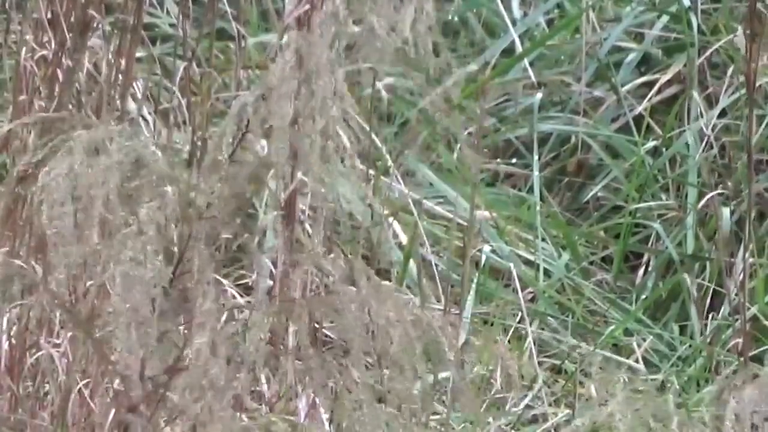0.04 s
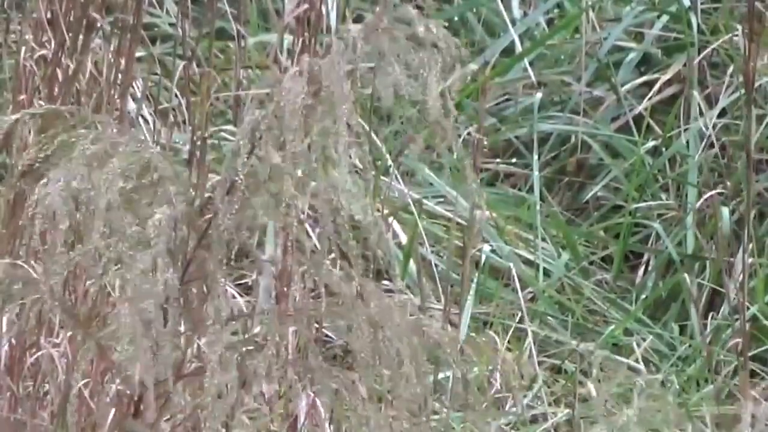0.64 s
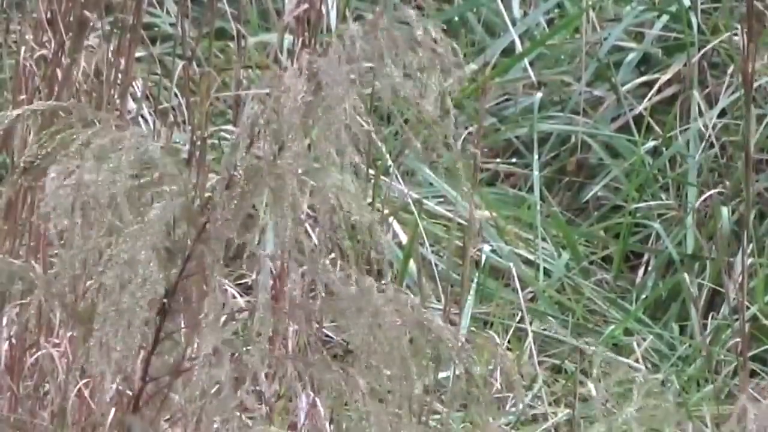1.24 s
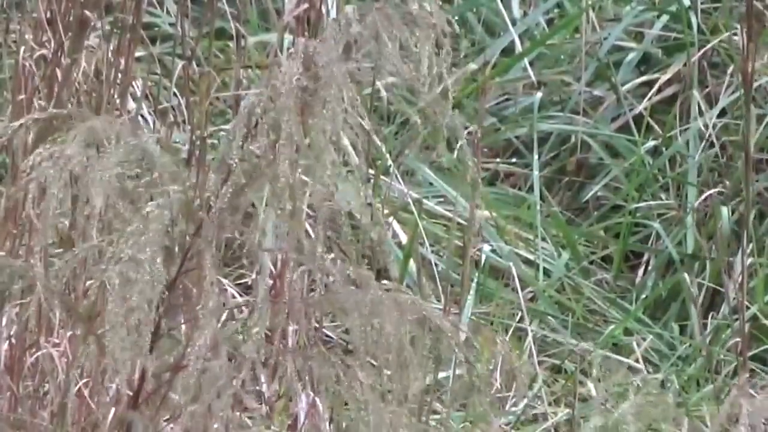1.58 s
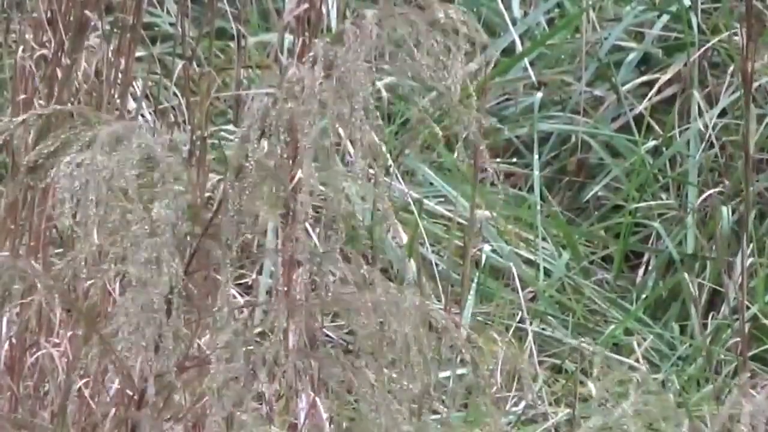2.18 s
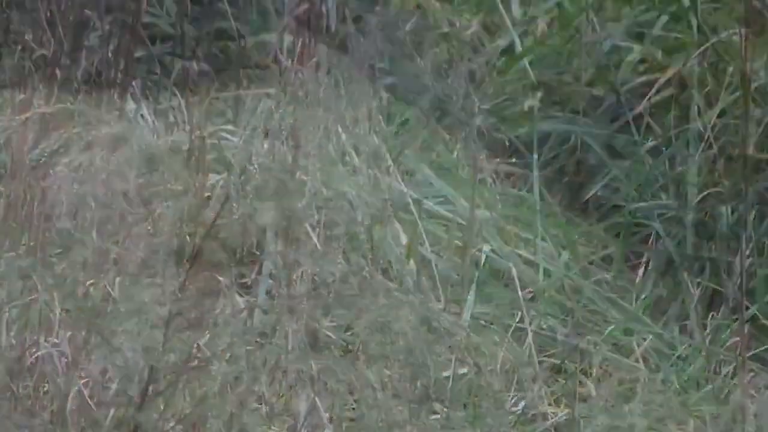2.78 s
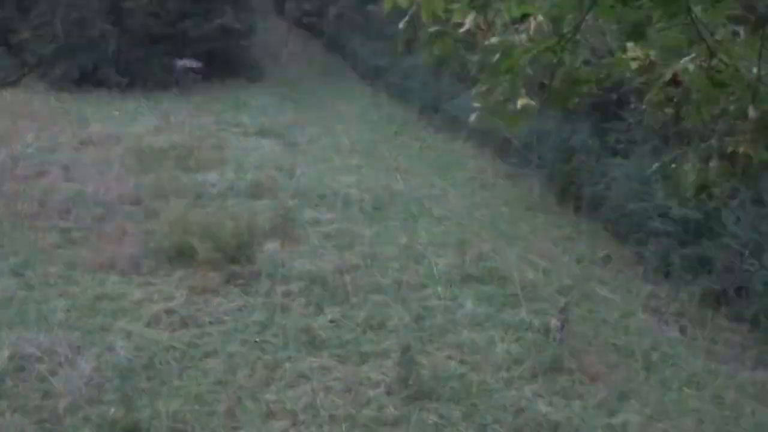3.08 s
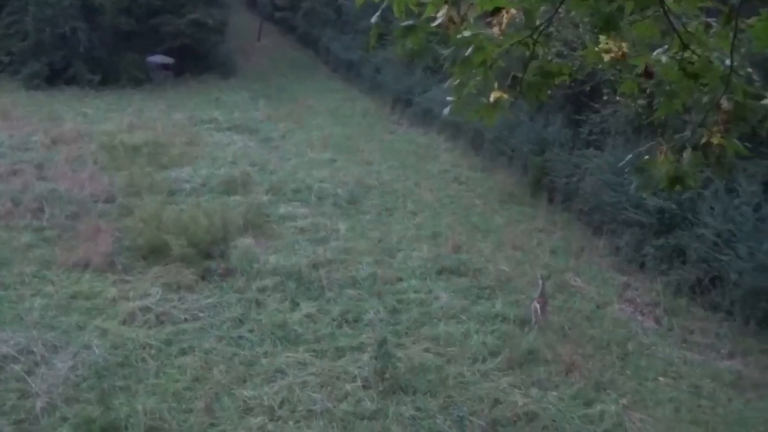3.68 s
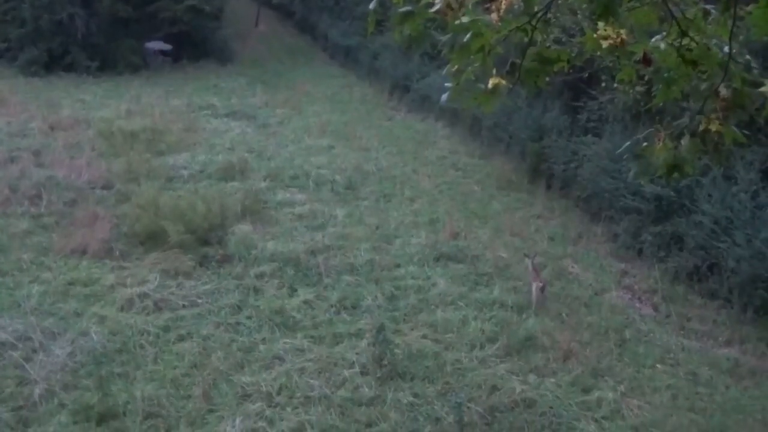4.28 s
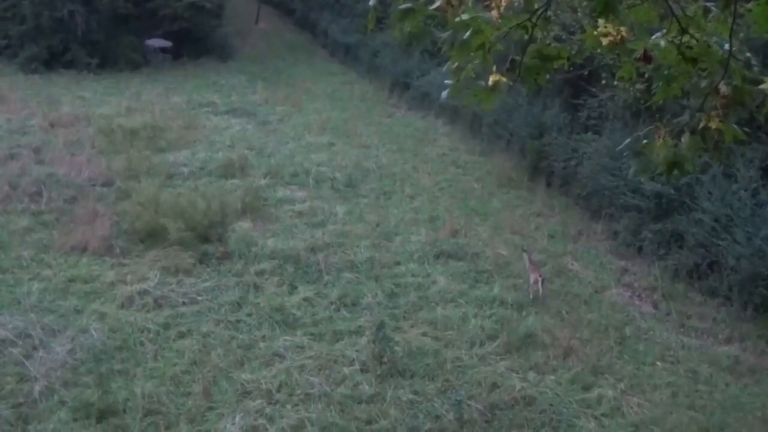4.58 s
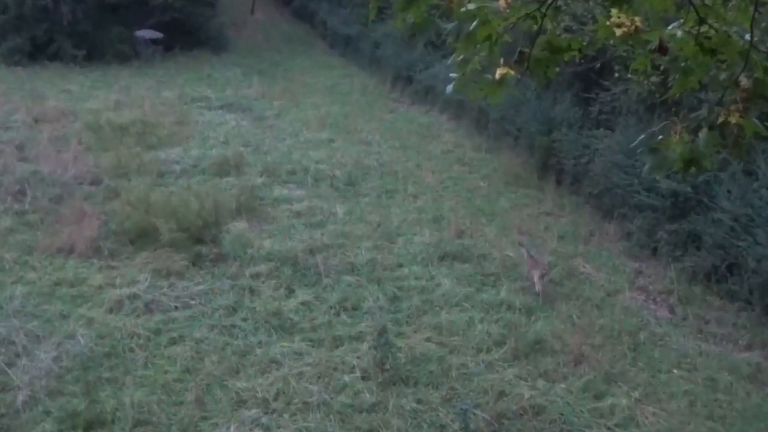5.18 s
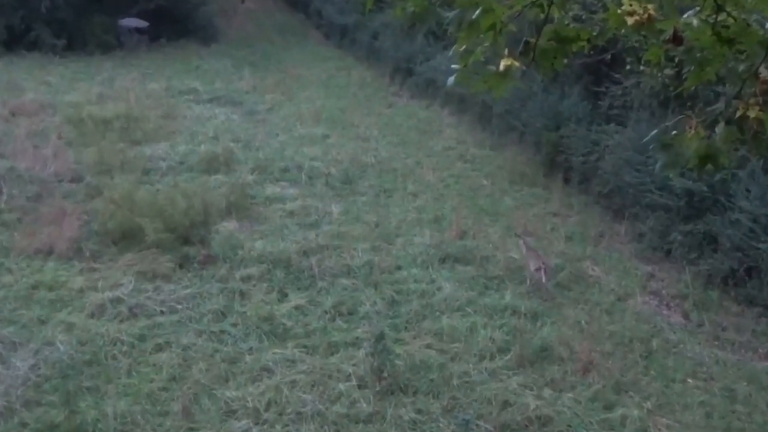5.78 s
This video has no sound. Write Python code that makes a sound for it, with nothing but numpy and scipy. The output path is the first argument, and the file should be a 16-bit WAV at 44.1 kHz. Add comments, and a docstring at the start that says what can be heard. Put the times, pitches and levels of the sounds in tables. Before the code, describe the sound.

A quiet outdoor evening in stereo, filled with the unbroken trilling of near and far crickets. At first, among reeds, bush crickets rasp, distant birds pip and far animals cry very faintly. The setting then blends into a meadow, with tree crickets pulsing from left and right at a lower pitch. A single close, dry click stands out just after the change, followed by a soft, distant knock. Small stem ticks are scattered throughout.

```python
"""Evening crickets trill near 5 kHz, first beside a reed bed, then fading over to an open meadow.
Each rubs one wing across the other: fast, unbroken strokes make a trill, short runs make a chirp.
Early on, bush crickets rasp, far birds whistle short pips and far animals give faint, gliding cries.
In the meadow, tree crickets take turns with pulsing calls near 4 kHz.
Dry stems tick now and then, and there is one sharp click close by and one dull bump farther off."""
import sys
import numpy as np
from scipy import signal
from scipy.fft import rfft, irfft, next_fast_len
from scipy.io import wavfile

SR = 44100
rng = np.random.default_rng(int(sys.argv[2]) if len(sys.argv) > 2 else 0)


def unload_wav(signal):
    """Save mono or channel-first audio to the path in sys.argv[1] as 16-bit WAV at rate SR, clipped to [-1, 1]."""
    wavfile.write(
        sys.argv[1],
        SR,
        np.round(np.clip(np.atleast_2d(signal).T, -1, 1) * 32767).astype(np.int16),
    )


N = 261954
T = np.arange(N) / SR


def from_db(db):
    """Turn decibels into a number to multiply a sound by."""
    return 10 ** (np.asarray(db) / 20)


def rms_one(x):
    """Scale a sound so that its average strength (rms) is 1."""
    return x / np.sqrt(np.mean(x ** 2) + 1e-20)


def in_time(rows):
    """Join (time, value) points with straight lines, one value per sample."""
    return np.interp(T, *np.transpose(rows))


def at_hz(points, hz):
    """Read a curve of (frequency, value) points at the given frequencies."""
    frequencies, values = np.transpose(points)
    return np.interp(np.log(hz + 1), np.log(frequencies), values)


def add(out, start, sound):
    """Mix a sound in at its start time, in seconds."""
    i = max(round(start * SR), 0)
    out[:, i:i + sound.shape[-1]] += sound[..., :N - i]


def drift(per_s):
    """A random wobble, about 1 in size, that heads for a new value per_s times a second."""
    return rms_one(np.interp(T * per_s, np.arange(1000), rng.standard_normal(1000)))


def band_noise(size, hz, spread):
    """A hiss centred on hz; more spread makes it broader."""
    edges = [hz / (1 + spread), min(hz * (1 + spread), SR / 2 - 1)]
    band = signal.butter(2, edges, "band", fs=SR, output="sos")
    return rms_one(signal.sosfilt(band, rng.standard_normal(size)))


def place(x, pan_db, lead_s):
    """Give a sound a direction: the left side hears it pan_db louder and lead_s sooner."""
    size = x.shape[-1]
    padded = next_fast_len(size + 64)
    side = np.array([[.5], [-.5]])
    hz = np.arange(padded // 2 + 1) * SR / padded
    time_shift = np.exp(2j * np.pi * hz * side * lead_s)
    return irfft(rfft(x, padded) * from_db(side * pan_db) * time_shift, padded)[:, :size]


def foliage(x, echo_db, t60):
    """Leaves and stems scatter a sound into a soft stereo echo that falls 60 dB in t60 seconds."""
    t = np.arange(SR // 4) / SR
    reflections = rng.standard_normal((2, len(t))) * from_db(-60 * t / t60)
    tail = signal.fftconvolve(x[None], reflections, axes=1)
    tail /= np.linalg.norm(tail, axis=1, keepdims=True)
    strength = np.linalg.norm(x)
    heard = np.pad(x, (0, len(t) - 1)) / strength + from_db(echo_db) * tail
    return (heard * strength / np.linalg.norm(heard, axis=1, keepdims=True))[:, :N]


def far_wash(spectrum, likeness):
    """Countless far sources blur into stereo noise; a likeness of 1 makes both sides the same."""
    size = next_fast_len(N)
    hz = np.arange(size // 2 + 1) * SR / size
    mid, side = rfft(rng.standard_normal((2, size)))
    alike = np.clip(at_hz(likeness, hz), -1, 1)
    both = np.sqrt(1 + alike) * mid + np.sqrt(1 - alike) * side * [[1], [-1]]
    return rms_one(irfft(both * from_db(at_hz(spectrum, hz)), size)[:, :N])


def wing_strokes(length, hz, per_s, duty, glide, scatter, uneven_db):
    """Each wing stroke drags a row of teeth over a scraper: one pulse that slides onto its pitch."""
    strokes = np.arange(round(length * SR)) / SR * per_s
    chance = rng.standard_normal((int(strokes[-1]) + 1, 3))
    detune, force, phase = chance[strokes.astype(int)].T
    along = np.minimum(strokes % 1 / duty, 1)   # duty is the share of each stroke that sounds
    pitch = hz * (1 + glide * (1 - along) ** 2 + scatter * detune)
    pressure = np.sin(np.pi * along) * from_db(uneven_db * force)
    return rms_one(pressure * np.sin(2 * np.pi * (np.cumsum(pitch) / SR + phase)))


def trillers(singers):
    """Unbroken fast trills, each insect rubbing its wings at its own speed."""
    out = 0
    for hz, per_s, db, pan_db in singers:
        song = wing_strokes(N / SR, hz, per_s, duty=.52, glide=.02, scatter=.01, uneven_db=1.5)
        song = foliage(song, echo_db=-2, t60=.1)
        out = out + from_db(db) * place(song, pan_db, lead_s=1.3e-5)
    return out


# near trillers in the reeds: (pitch [Hz], wing strokes [1/s], level [dB], left over right [dB])
REED_TRILLS = [(5370, 66.0, -54, -0.5), (5010, 62.5, -60, 6), (5224, 71.0, -60, 3), (6210, 47.0, -66, -4),
               (6590, 63.0, -65, -3), (8200, 32.0, -68, -9)]
# tone of the far insects, then of the air: (frequency [Hz], relative level [dB])
REED_INSECTS = [(3000, -37), (4000, -29), (4300, -11.5), (4600, -9), (4850, 0.5), (5450, -1.5),
                (5800, -6.5), (6250, -7), (6650, -9.5), (7150, -12.5), (8800, -14), (9900, -10),
                (11000, -17), (12000, -68)]
REED_AIR = [(15, -67), (25, -39), (54, -38), (80, -15), (123, -8), (200, -9), (264, -8.5), (412, -12.5),
            (592, -9), (964, -10.5), (1140, -11), (1300, -6.5), (1540, -11.5), (2070, -14.5), (4000, -17.5),
            (5200, -36), (8800, -120)]
# how alike left and right sound: (frequency [Hz], likeness [0-1])
REED_LIKENESS = [(120, 0.98), (300, 0.84), (520, 0.26), (950, 0.085), (1350, 0.53), (2100, .05),
                 (3200, 0.29), (4500, 0.87), (7000, 1), (10000, 1)]
# a farther small cricket: (first chirp [s], repeat time [s], chirp length [s], pitch [Hz], level [dB])
REED_CHIRPERS = [(.183, .58, .067, 7080, -62)]


def reed_bed(air_db=-60, insects_db=-51, flutter_db=.86):
    """Still air and a dense wall of far insects behind the trillers and one steady chirper."""
    far = from_db(insects_db + flutter_db * drift(60)) * far_wash(REED_INSECTS, REED_LIKENESS)
    air = from_db(air_db) * far_wash(REED_AIR, REED_LIKENESS)
    return air + place(far, 0, lead_s=1.1e-5) + trillers(REED_TRILLS) + chirpers(REED_CHIRPERS)


def small_cricket(chirps, length, hz):
    """One insect's chirps, each a run of four to seven wing strokes that grow louder."""
    out = np.zeros((2, N))
    for start, db in chirps:
        song = wing_strokes(length, hz, per_s=63, duty=.7, glide=-.02, scatter=.002, uneven_db=1)
        song *= from_db(np.linspace(-4, 1.5, len(song)))
        add(out, start, from_db(db) * foliage(song, echo_db=-8, t60=.12))
    return place(out, -1.2, lead_s=8e-6)


# chirps of the nearest small cricket: (start [s], level [dB])
NEAR_CHIRPS = [(.075, -61), (.44, -60), (.864, -57.5), (1.188, -58), (1.525, -60), (1.864, -57.5),
               (2.178, -56.5), (2.676, -64)]


def near_cricket():
    """The nearest small cricket repeats one high chirp at a loose pace."""
    return small_cricket(NEAR_CHIRPS, length=.067, hz=7580)


# bush cricket rasps: (start [s], length [s], centre frequency [Hz], level [dB])
RASPS = [(.115, 0.022, 9400, -53), (0.148, 0.057, 9200, -51.5), (.24, .03, 8800, -59),
         (1.231, 0.031, 9700, -49.5), (1.323, 0.044, 8300, -48.5), (1.427, .02, 9120, -50),
         (1.66, .02, 8600, -59), (1.843, 0.043, 9350, -49), (2.668, .04, 9400, -55.5)]


def bush_crickets():
    """Each rasp is one dry wing stroke: tiny teeth make a burst of noise that starts fast and fades."""
    out = np.zeros((2, N))
    for start, length, hz, db in RASPS:
        along = np.linspace(0, 1, round(length * SR))
        stroke = band_noise(len(along), hz, spread=.12) * np.interp(along, [0, .12, 1], [0, 1, .4])
        add(out, start, from_db(db) * foliage(stroke, echo_db=-5, t60=.042))
    return place(out, -1, lead_s=1e-5)


def chirpers(insects, uneven_db=.8):
    """Farther small crickets each keep a steady beat, some chirps a little louder than others."""
    out = 0
    for first, period, length, hz, db in insects:
        starts = np.arange(first, T[-1], period)
        chirps = [(start, db + uneven_db * rng.standard_normal()) for start in starts]
        out = out + small_cricket(chirps, length, hz)
    return out


def whistle(pitch, waver):
    """A pure tone whose pitch trembles; waver is the tremble as a share of the pitch."""
    unsteady = pitch * (1 + waver * drift(148.4)[:len(pitch)])
    return np.sqrt(2) * np.sin(2 * np.pi * np.cumsum(unsteady) / SR)


def pips(calls, width_s, waver, echo_db, pitch_ratio=1, late_s=0):
    """Short bird whistles that rise and fall in an arch, loudest late_s after the top."""
    fall_per_s, top_s = 3.4, .008   # share of the top pitch lost per second; width of the rounded top
    out = np.zeros((2, N))
    t = late_s + np.arange(-2 * width_s, 2 * width_s, 1 / SR)
    arch = pitch_ratio * (1 - fall_per_s * (np.hypot(t, top_s) - top_s))
    swell = np.exp(-((t - late_s) / width_s) ** 2)
    for middle, hz, db in calls:
        pip = swell * whistle(hz * arch, waver)
        add(out, middle + t[0], from_db(db) * foliage(pip, echo_db, t60=.5))
    return place(out, 0, lead_s=5e-5)


# pips of the nearest bird, then the flock's clearest answers: (middle [s], top pitch [Hz], level [dB])
BIRD_PIPS = [(.312, 1361, -53), (.892, 1340, -54), (1.502, 1337, -54.5), (2.238, 1333, -54),
             (2.815, 1340, -60)]
FLOCK_ANSWERS = [(0.431, 1476, -57.5), (1.135, 1435, -58.5), (1.73, 1413, -58.5), (2.16, 1497, -60)]


def birds(upper_db=-12):
    """The nearest bird is clear, with a hoarse second voice above; distance blurs the answers."""
    near = pips(BIRD_PIPS, width_s=.031, waver=.0084, echo_db=-11)
    upper = pips(BIRD_PIPS, width_s=.075, waver=.035, echo_db=-2, pitch_ratio=1.39, late_s=.035)
    answers = pips(FLOCK_ANSWERS, width_s=.036, waver=.014, echo_db=.5)
    return near + from_db(upper_db) * upper + answers


def far_flock(per_s=4.5, hz=1433, spread_hz=39.6, db=-65.5):
    """The rest of the flock pips faintly in the reeds at random moments."""
    chance = rng.random((round(per_s * T[-1]), 2))
    calls = [(when * T[-1], hz + spread_hz * (2 * tone - 1), db) for when, tone in chance]
    return pips(calls, width_s=.034, waver=.015, echo_db=-1.5)


# dry stems ticking: (time [s], peak before the echo [dB], centre frequency [Hz], spread [ratio])
STEM_TICKS = [(0.713, -42.5, 3050, 0.15), (2.2651, -48, 3020, .15), (2.627, -45, 2880, .5),
              (2.934, -49, 2360, 0.16), (3.0051, -48.5, 2900, 0.25), (3.8791, -46, 9100, .08),
              (3.9144, -48, 8200, .2), (4.221, -38.5, 8800, 0.18), (4.669, -41, 3080, 0.42)]


def stems(rise_s=.00074, t60=.022):
    """Dry stems give small ticks that build up fibre by fibre and die quickly."""
    out = np.zeros((2, N))
    t = np.arange(SR // 20) / SR
    loudness = (1 - np.exp(-t / rise_s)) * from_db(-60 * t / t60)
    for start, db, hz, spread in STEM_TICKS:
        tick = band_noise(len(t), hz, spread) * loudness
        tick /= np.abs(tick).max()
        add(out, start, from_db(db) * foliage(tick, echo_db=-4, t60=.077))
    return out


# cries of far animals: (start [s], length [s], first pitch [Hz], last pitch [Hz], level [dB])
CRIES = [(.78, 0.33, 588, 635, -74), (1.34, 0.15, 720, 642, -72), (1.70, 0.16, 740, 846, -71),
         (1.93, 0.38, 736, 750, -72), (2.33, .3, 693, 678, -73.5), (2.4, 0.65, 875, 806, -75)]


def far_cries(rise_s=.03, fall_s=.056, fade_db_per_s=3):
    """Distance leaves only the strongest tone of each cry: one slow slide in pitch that fades."""
    out = np.zeros((2, N))
    for start, length, first_hz, last_hz, db in CRIES:
        t = np.arange(0, length, 1 / SR)
        soft_ends = np.clip(np.minimum(t / rise_s, (length - t) / fall_s), 0, 1)
        loudness = soft_ends * from_db(db - fade_db_per_s * t)
        cry = loudness * whistle(np.linspace(first_hz, last_hz, len(t)), waver=.024)
        add(out, start, foliage(cry, echo_db=-2.5, t60=.3))
    return out


# near trillers in the meadow: (pitch [Hz], wing strokes [1/s], level [dB], left over right [dB])
MEADOW_TRILLS = [(5420, 60.7, -59, -2), (4945, 61, -60, -1), (5160, 64, -56.5, 4), (5330, 62.0, -63, -3),
                 (4760, 59.5, -57, -9), (6070, 23.5, -70, 4.5)]
# tone of the far insects, then of the air: (frequency [Hz], relative level [dB])
MEADOW_INSECTS = [(3300, -32.5), (4250, -12), (4480, -6), (4680, -6.5), (5000, 0), (5480, -4),
                  (5700, -11.5), (6200, -14), (6500, -20.5), (8600, -22), (9200, -15.5), (10200, -13),
                  (11000, -24), (12000, -64)]
MEADOW_AIR = [(15, -80), (25, -74), (59, -26.5), (109, -2), (164, -7.5), (197, -6), (222, -6), (411, -6),
              (514, -5), (1340, -7), (2860, -10.5), (3300, -11), (4290, -73), (7260, -120)]
# how alike left and right sound: (frequency [Hz], likeness [0-1])
MEADOW_LIKENESS = [(120, 0.97), (300, 0.73), (520, 0.17), (950, 0.00055), (2400, 0.079), (3400, 0.55),
                   (4500, 1), (7000, 0.82), (10000, 1)]
# farther small crickets: (first chirp [s], repeat time [s], chirp length [s], pitch [Hz], level [dB])
MEADOW_CHIRPERS = [(2.97, .775, .105, 6670, -68.5), (3.41, .312, .075, 7310, -69.5)]


def meadow(air_db=-62, insects_db=-51, flutter_db=.7, hum_hz=197.4, hum_db=-77.5):
    """Wider, quieter air, a faint far hum and insects singing at a slightly lower pitch."""
    far = from_db(insects_db + flutter_db * drift(60)) * far_wash(MEADOW_INSECTS, MEADOW_LIKENESS)
    hum = from_db(hum_db + 2 * drift(4.52)) * np.sin(2 * np.pi * hum_hz * T)
    air = from_db(air_db) * far_wash(MEADOW_AIR, MEADOW_LIKENESS)
    singers = trillers(MEADOW_TRILLS) + chirpers(MEADOW_CHIRPERS)
    return air + hum + place(far, -.5, lead_s=1.1e-5) + singers


# loudness of the far tree crickets: (time [s], level [dB])
TREE_CHORUS = [(0, -94), (2.1, -83), (2.45, -63), (3.0, -52.5), (3.7, -48.5), (4.5, -51.5), (5.3, -51),
               (5.7, -46.5), (5.94, -53)]
# their tone: (frequency [Hz], relative level [dB])
TREE_TONE = [(3000, -29), (3400, -16), (3700, -3), (3900, 4.5), (4080, 0), (4250, -20), (4600, -31.5)]
# near calls: (start [s], length [s], pitch [Hz], wing strokes [1/s], level [dB], left over right [dB])
TREE_CALLS = [(2.73, 0.432, 4080, 35, -49, 6.5), (3.30, 0.47, 4157, 37, -53, -5),
              (3.53, 0.37, 3982, 37, -49, -4.5), (3.90, 0.39, 3865, 36.2, -51, 2),
              (4.76, 0.48, 3840, 34, -54.5, -7), (5.351, 0.43, 4040, 39, -46, 6.5),
              (5.53, 0.39, 3910, 46, -55, -9)]


def tree_crickets(swell_db=2):
    """Swelling calls of about fifteen wing strokes, each rising in pitch, over a far chorus."""
    out = from_db(in_time(TREE_CHORUS)) * far_wash(TREE_TONE, MEADOW_LIKENESS)
    for start, length, hz, per_s, db, pan_db in TREE_CALLS:
        song = wing_strokes(length, hz, per_s, duty=.82, glide=-.025, scatter=.002, uneven_db=1.2)
        soft_ends = signal.windows.tukey(len(song), .2)
        swell = from_db(swell_db * np.linspace(-.5, .5, len(song)))
        song = foliage(song * soft_ends * swell, echo_db=-2, t60=.25)
        add(out, start, from_db(db) * place(song, pan_db, lead_s=0))
    return place(out, 0, lead_s=3e-5)


def click(at_s=3.24, db=-28.5, gap_s=.0006, dip_s=.0002, crest_s=.00015, low_cut_hz=60):
    """One close, dry click from the right: the air pressure dips, then jumps up more briefly."""
    t = T - at_s
    dip = np.exp(-(t / dip_s) ** 2)
    crest = dip_s / crest_s * np.exp(-((t - gap_s) / crest_s) ** 2)
    bass_cut = signal.butter(2, low_cut_hz, "high", fs=SR, output="sos")
    pulse = signal.sosfilt(bass_cut, crest - dip + 1e-18)
    return from_db(db) * place(pulse, 0, lead_s=-.00031)


def bump(at_s=4.09, db=-55.5, hz=320, t60=.16):
    """A soft, dull knock some way off: low noise that dies away quickly."""
    out = np.zeros((2, N))
    t = np.arange(SR // 5) / SR
    knock = band_noise(len(t), hz, spread=.51) * from_db(-60 * t / t60)
    add(out, at_s, from_db(db) * foliage(knock, echo_db=-13, t60=.3))
    return out


# the fade from reeds to meadow: (time [s], share of the meadow [0-1])
MEADOW_SHARE = [(0, 0.07), (2.3, 0), (2.65, 0.3), (3.15, 1), (5.94, 0.98)]


def scene():
    """The reed bed fades into the meadow; single calls, ticks and knocks sound on top."""
    share = in_time(MEADOW_SHARE)
    reeds = reed_bed() + far_flock()
    background = (1 - share) * reeds + share * meadow()
    callers = near_cricket() + tree_crickets() + bush_crickets() + birds() + far_cries()
    return background + callers + stems() + bump() + click()


def record(dry, cutoff_hz=11100):
    """A steep filter takes away the highest treble."""
    return signal.sosfilt(signal.ellip(12, .2, 70, cutoff_hz, fs=SR, output="sos"), dry)


dry = scene()
out = record(dry)
unload_wav(out)
```